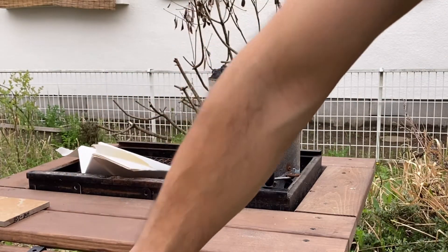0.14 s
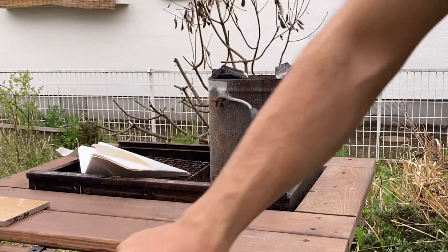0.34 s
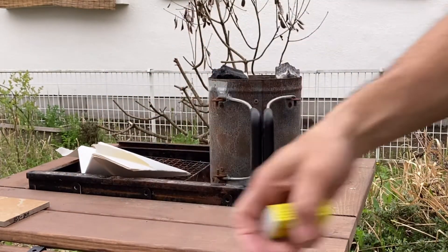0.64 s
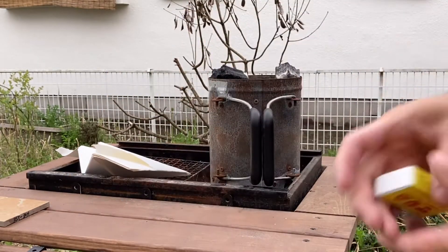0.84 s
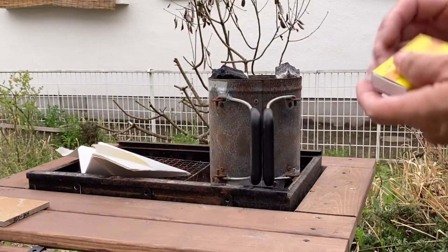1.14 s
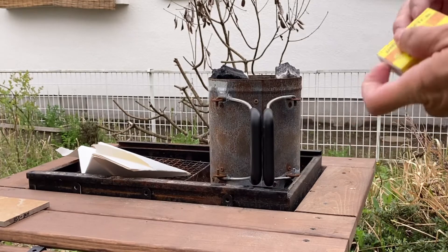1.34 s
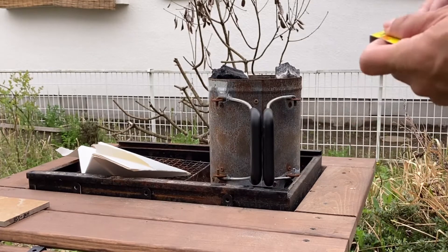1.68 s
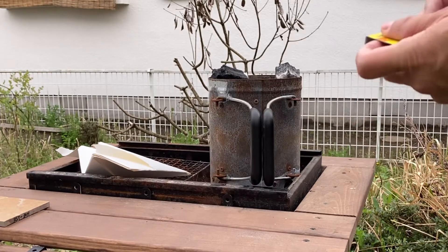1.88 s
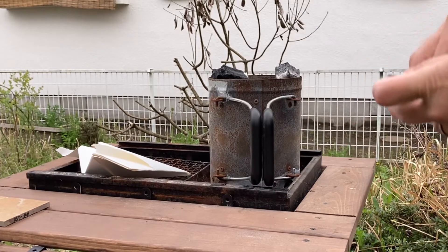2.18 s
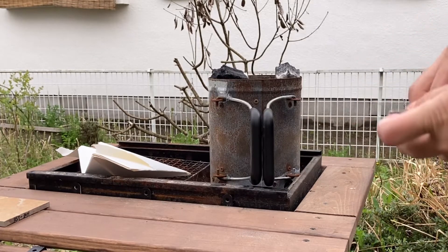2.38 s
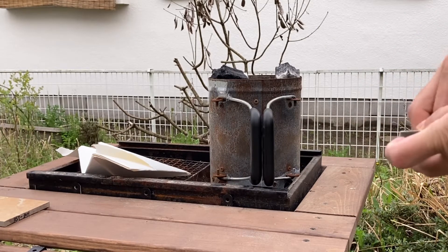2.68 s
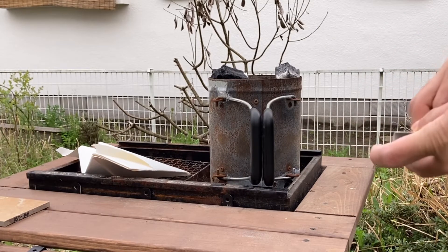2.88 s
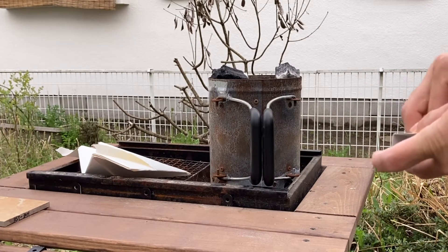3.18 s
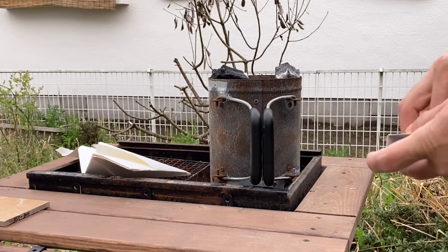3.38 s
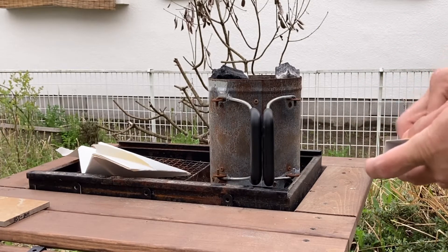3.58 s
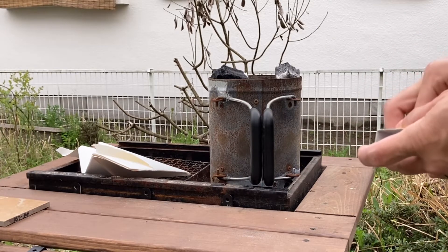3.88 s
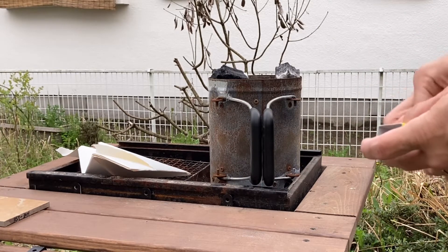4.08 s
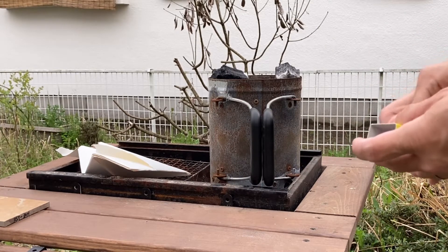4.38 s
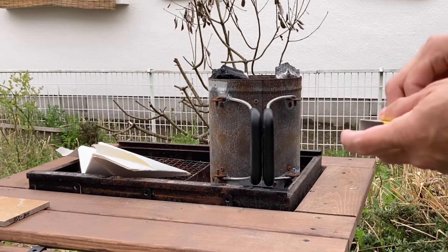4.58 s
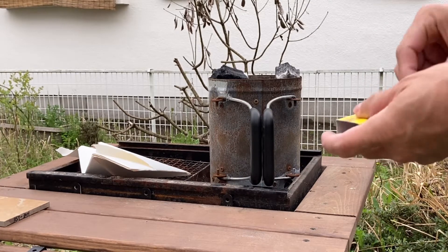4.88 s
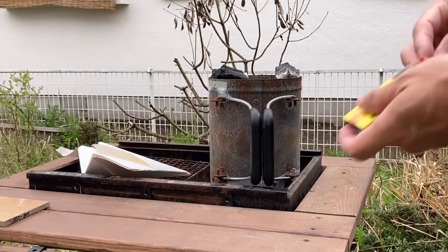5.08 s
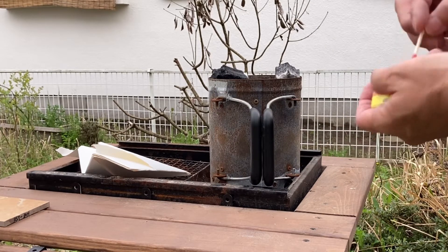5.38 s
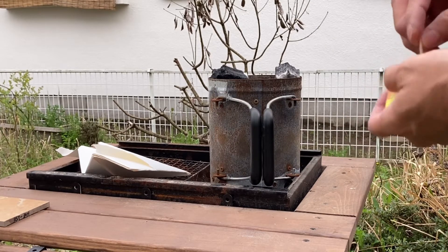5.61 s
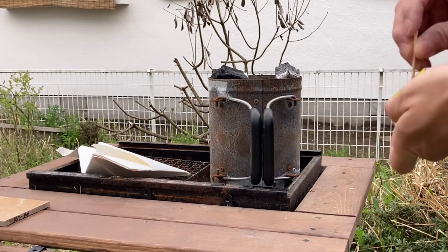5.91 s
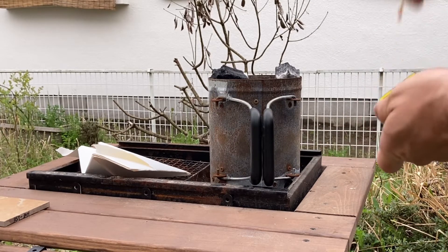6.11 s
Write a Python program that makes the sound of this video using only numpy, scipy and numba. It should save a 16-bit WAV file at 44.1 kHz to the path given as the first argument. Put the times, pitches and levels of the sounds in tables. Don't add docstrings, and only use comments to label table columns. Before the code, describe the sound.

A close stereo pickup catches a bright, irregular flurry of metal clinks on a garden table during the first three quarters of a second. Cardboard clicks and soft finger rustling follow, with scattered faint ticks of loose matches. The rummaging then grows denser, dry and woody, before a couple of sharper box knocks and quiet final ticks. Low distant traffic, slight wind and a very faint machine tone lie behind.

```python
import sys
import numpy as np
from scipy import signal
from scipy.fft import rfft, irfft, next_fast_len
from scipy.io import wavfile
from scipy.ndimage import uniform_filter1d
from numba import njit

SR = 44100
rng = np.random.default_rng(int(sys.argv[2]) if len(sys.argv) > 2 else 0)


def boost(x):
    u = np.asarray(x, float) / 20
    return 10 ** u


def output_pcm(signal):
    pcm = np.clip(np.atleast_2d(signal).T, -1, 1) * 32767
    wavfile.write(sys.argv[1], SR, np.round(pcm).astype(np.int16))


N = 275620


def columns(table, count=N):
    s, *values = np.transpose(table)
    return [np.interp(np.arange(count) / SR, s, v) for v in values]


def unit(x):
    return x / np.sqrt(np.mean(x ** 2))


def colour(x, table):
    hz, db = np.transpose(table)
    size = next_fast_len(N, True)
    f = np.arange(1, size // 2 + 2) * SR / size
    gain = boost(np.interp(np.log(f), np.log(hz), db))
    return irfft(rfft(x, size) * gain, size)[..., :N]


@njit
def ring(x, hz, t60, keep):
    pole = np.exp((2j * np.pi * hz - np.log(1000) / t60) / SR)
    out, z = np.empty(len(x)), 0j
    for i in range(len(x)):
        z = z * pole * keep[i] + x[i]
        out[i] = z.imag
    return out


def grit(count, spread_db):
    return unit(rng.standard_normal(count) * boost(spread_db * rng.exponential(size=count)))


def walk(rate, count=N):
    k = int(SR / rate)
    steps = np.repeat(rng.standard_normal(count // k + 1), k)
    return 2.14 * uniform_filter1d(uniform_filter1d(steps, k), k)[:count]


# pitch_hz, level_db (per Hz)
YARD_TONE = [(20, -36), (40, -8), (100, -8.5), (230, -10), (400, -9.5), (735, -17.5), (1260, -17.5),
             (2500, -28), (4000, -32.5)]
# start_s, end_s, level_db
MACHINE_RUNS = [
    (2.737, 3.3, -76),
    (3.543, 4.892, -71.5),
    (6.001, 6.5, -76),
]
# centre_s, level_db, half_length_s
PUFFS = [(0.378, -64, 0.29), (.95, -65, 0.032), (1.303, -69.5, 0.22), (2.42, -66.5, 0.051),
         (3.846, -65, 0.071), (4.505, -58, 0.03), (4.963, -59, 0.025), (5.6, -69, .05)]


def yard():
    t = np.arange(N) / SR
    far = YARD_TONE + [(6500, -57.5), (16000, -66)]
    mid, side = (colour(rng.standard_normal(N), far) for _ in range(2))
    side = colour(side, [(20, -7), (300, -8), (1000, 0), (5000, 4)])
    gust = boost(-65.5 + walk(3.204)) / np.std(mid)

    wind = unit(colour(rng.standard_normal(N), [(20, -30), (42, -2), (62, 0), (110, -10), (600, -90)]))
    wind_level = boost(-69 + 1.6 * walk(9.5))
    wind_level += sum(boost(db) * np.exp(-((t - s) / half) ** 2) for s, db, half in PUFFS)

    machine_hz, edge_s, waver_db = 402, 0.019, 1.7
    runs = sum(boost(db) * np.clip(np.minimum(t - on, off - t) / edge_s, 0, 1) for on, off, db in MACHINE_RUNS)
    tone = np.sqrt(2) * np.sin(2 * np.pi * np.cumsum(machine_hz + 1.62 * walk(6)) / SR)
    hum = runs * boost(waver_db * walk(21.03)) * tone
    return gust * (mid + side * np.array([[1], [-1]])) + hum + wind_level * wind * boost(np.array([[-1.2], [1.2]]))


# start_s, peak_db, top_modes_db, table_thud_db, chatter_length_s
CLINKS = [(0.063, -38.5, -5, -55.5, 0.019), (0.1085, -20.5, -3, -41.5, 0.00041),
          (0.138, -29.5, -3.5, -47.5, 0.017), (0.175, -36, -6, -59, 0.0067),
          (0.184, -29.5, -11, -46.5, 0.022), (0.193, -30, -5.5, -60.5, 0.06),
          (0.272, -27, -15, -49.5, 0.0055), (0.288, -19.5, -4.5, -41, 0.00076),
          (0.3, -19, -10.5, -37.5, 0.02), (0.352, -23.5, -0.5, -26.5, 0.0011),
          (0.362, -19.5, -0.5, -29.5, 0.0029), (0.373, -23.5, 0, -27.5, 0.025),
          (0.4245, -16, -9, -40.5, 0.0012), (0.429, -22.5, 1, -37.5, 0.024),
          (0.462, -23.5, -11, -38, 0.0056), (0.484, -31.5, -3.5, -40.5, 0.0078),
          (0.523, -22, -8.5, -41, 0.032), (0.643, -46.5, -4, -50, 0.021),
          (0.697, -42.5, -14.5, -54, 0.0021), (0.706, -29.5, -2.5, -37.5, 0.0076),
          (0.7375, -28, 0, -52, 0.00061), (0.745, -29.5, -2, -44.5, 0.0079),
          (1.1082, -39.5, -10, -51, 0.00066), (1.122, -37, -1, -45.5, 0.0068)]
# pitch_hz, extra_db of the modes near it
STRUCK = [(6360, 2), (11700, 4), (6380, 7.5), (6410, 10), (6410, 6.5), (7750, -2), (6400, 4), (7750, 0.5),
          (7800, 1), (11500, 0), (11500, 7), (11500, 5.5), (15200, 6.5), (7770, 5), (7750, 2.5),
          (15300, 9.5), (7750, 0), (12160, 4), (7750, -5), (11600, -1), (11000, 6), (10540, 1.5), (9000, 3),
          (11700, 3.5)]
STEEL_HZ = [2708, 3730, 3801, 4242, 4791, 5103, 5873, 6357, 6900, 7543, 7752, 8030, 8805, 9690, 9992, 10540,
            10628, 10683, 11299, 11707, 11787, 12200, 12620, 13050, 14325, 15080, 15300, 15740]
# level_db, ring_s (time to fall 60 dB)
STEEL = [(-16.5, 0.1), (-15.5, 0.22), (-10.5, 0.16), (-10, 0.0796), (-15, .08), (-5.5, 0.17), (-19, 0.15),
         (-3.5, 0.14), (-13.5, 0.12), (-9.5, 0.17), (0.5, 0.068), (-8.5, 0.15), (8, 0.027), (-5, 0.096),
         (-8, .09), (-7.5, 0.13), (-8.5, 0.2), (-15, 0.033), (-8, 0.086), (0, 0.012), (-6, 0.096),
         (-19.5, 0.054), (-14.5, 0.17), (3, 0.029), (-3.5, 0.17), (-13, 0.047), (-10.5, 0.15), (-14, .09)]
# pitch_hz, level_db, ring_s (time to fall 60 dB)
TABLE = [(171, -17.5, 0.07), (317, -7, 0.026), (430, -6, 0.09), (584, -5, 0.028), (830, -7, 0.04),
         (1005, -3.5, 0.017), (1200, 3, 0.011), (1642, -0.5, 0.017), (2050, -0.5, 0.01),
         (2380, -11.5, 0.018), (3080, -6, 0.011)]
# centre_s, half_length_s, loss_db
GRIPS = [(0.11, 0.0089, 19.5), (0.326, 0.01, 18.5), (0.384, 0.0036, 5), (0.431, .006, 11), (0.5, 0.023, 0),
         (0.715, 0.0047, 6.5), (0.743, 0.015, 5), (1.127, 0.01, 11.5)]


def steel():
    count = int(1.6 * SR)
    t = np.arange(count) / SR
    s, peak_db, top_db, thud_db, length = np.transpose(CLINKS)
    low_db = -1 - 0.24 * (peak_db - np.mean(peak_db))
    length = np.maximum(length, 0.0003)[:, None]
    chatter = np.exp(-((t - s[:, None] - length / 2) / length) ** 2) / np.sqrt(length * SR)
    loss_db = sum(abs(db) * np.exp(-((t - at) / half) ** 2) / (half * SR * np.sqrt(np.pi))
                  for at, half, db in GRIPS)
    keep = boost(-loss_db)
    struck_hz, struck_db = np.transpose(STRUCK)
    struck_octaves = 0.08
    chance = rng.standard_normal((len(s), len(STEEL) + len(TABLE)))
    touch = boost(2.2 * rng.exponential(size=count))
    out, thud = np.zeros(N), np.zeros(N)

    for k, (hz, db, t60) in enumerate(np.column_stack([STEEL_HZ, STEEL])):
        top, low = hz > 9200, hz < 5600
        near_db = struck_db * np.exp(-(np.log2(hz / struck_hz) / struck_octaves) ** 2)
        wobble = keep * np.exp(2j * np.pi * 4 * walk(30, count=count) / SR)
        blow_db = peak_db + top * (top_db + 5) + low * low_db + 4.5 * chance[:, k] - 6.5 + near_db
        contacts = unit(touch * rng.standard_normal(count))
        out[:count] += boost(db) * ring(boost(blow_db) @ chatter * contacts, hz, t60, wobble)
    out[:count] += boost(-52.5) * np.sin(2 * np.pi * STEEL_HZ[0] * t) * np.exp(-t / 0.045)

    for k, (hz, db, t60) in enumerate(TABLE):
        blows = boost(thud_db + 0.6 * chance[:, -k - 1]) @ chatter
        thud[:count] += boost(db) * ring(blows * rng.standard_normal(count), 1.0 * hz, t60, np.ones(count, complex))

    crack = boost(peak_db + top_db + 8 - 1200 * length[:, 0]) @ chatter
    out[:count] += crack * unit(touch * np.gradient(rng.standard_normal(count)))
    return colour(out, [(1500, -35), (2600, 1)]) + colour(thud, [(60, -40.5), (130, 2)])


# time_s, level_db
EFFORT = [(.9, -58.5), (1.2, -68.5), (1.29, -60.5), (1.5, -59.5), (1.62, -72.5), (1.96, -60), (2.5, -68),
          (3.03, -58.5), (3.28, -66.5), (3.4, -63), (4.0, -62.5), (4.47, -64), (4.75, -78.5), (5.12, -57.5),
          (5.3, -77), (5.47, -62.5), (5.62, -66), (6.05, -76.5)]
# centre_s, level_db, half_length_s, centre_hz, treble_db
SLIDES = [(0.839, -43, 0.02, 1570, -18.5), (0.843, -48, 0.0096, 3892, 11.5), (1.707, -44, 0.022, 2966, 3.5),
          (1.814, -52, 0.019, 2520, -28), (1.928, -56.5, 0.016, 2350, -5), (2.104, -57, 0.046, 2450, -1),
          (2.666, -59, 0.013, 3170, -6), (2.944, -42.5, 0.012, 2470, 2), (3.082, -33, 0.0033, 2830, -27),
          (3.223, -45, 0.013, 2160, -3.5), (3.367, -55.5, 0.05, 2320, -8), (3.62, -45.5, 0.0049, 2520, 1.5),
          (3.834, -43, 0.012, 2050, -3), (4.091, -53, 0.0086, 2200, 4.5), (4.094, -64, 0.0055, 2500, 0),
          (4.49, -63, 0.044, 2240, -7), (4.624, -56.5, 0.018, 2780, -5.5), (4.897, -61, 0.029, 2195, -6),
          (4.937, -54, 0.0082, 2015, -2), (5.031, -56, 0.009, 2050, 12.5), (5.052, -51, 0.029, 1480, -5.5),
          (5.199, -61.5, 0.027, 2040, -1.5), (5.378, -54.5, 0.023, 1610, -3.5),
          (5.803, -56.5, 0.021, 1310, -20), (5.836, -63, 0.028, 1500, -9)]
# pitch_hz, level_db (per Hz)
CARD = [(290, -49), (500, -6.5), (850, -4), (1540, -4.5), (2720, -3.5), (5500, -16.5), (7150, -42),
        (12100, -120)]
# pitch_hz, level_db (per Hz)
CRACK = [(2500, -34), (4000, 1), (5800, -5), (8000, 0), (11000, -1), (13500, -9), (15500, -4.5),
         (16600, -38)]


def handling():
    effort_db = columns(EFFORT)[0]
    treble_db = -7 + np.mean(effort_db) + 1.48 * (effort_db - np.mean(effort_db))
    patch = boost(1.7 * walk(30))
    grains = grit(N, 2.6)
    fine = unit(colour(grains, CRACK))
    skin = boost(effort_db - 3) * unit(colour(grit(N, 1.7), CARD))
    out = patch * (skin + boost(treble_db) * unit(colour(grit(N, 1.4), CRACK)))

    boards_s, boards_db, rise_db_s, fall_db_s = 0.56, -61, 34, 16.5
    boards = colour(rng.standard_normal(N), [(90, -30), (170, -3), (320, 0), (600, -3), (2000, -70)])
    since = np.arange(N) / SR - boards_s
    fade_db = np.maximum(-rise_db_s * since, fall_db_s * since)
    out += boost(boards_db - fade_db + 2 * walk(28)) * unit(boards)

    for s, db, half, hz, top_db in SLIDES:
        i = slice(int((s - 0.1) * SR), int((s + 0.1) * SR))
        swell = np.exp(-((np.arange(i.start, i.stop) / SR - s) / half) ** 2)
        band = signal.lfilter(*signal.butter(2, [hz / 1.42, hz * 1.35], "band", fs=SR), grains[i])
        out[i] += boost(db) * swell * patch[i] * (unit(band) + boost(top_db) * fine[i])
    return out


# start_s, peak_db, box_pitch_hz, crack_db
TURN_TICKS = [(0.793, -23, 1450, -28), (0.802, -23, 1570, -17), (0.819, -34, 1610, -26),
              (0.829, -27, 1530, -35), (0.836, -22, 1536, -11), (0.844, -17.5, 3600, -9),
              (0.874, -30.5, 1530, -11), (0.895, -33.5, 1500, -7), (0.984, -44.5, 1470, -15),
              (1.184, -43, 1430, -8), (1.677, -41, 4240, -17), (1.704, -43, 3000, -20),
              (1.812, -28.5, 2280, -10), (1.9, -30.5, 2800, -24), (2.021, -37, 2450, -17),
              (2.056, -34.5, 2440, -11.5), (2.088, -33, 2390, -3), (2.162, -39, 2620, -10.5),
              (2.364, -35.5, 2750, -7.5), (2.586, -41, 2300, -19.5), (2.664, -41, 2940, -12),
              (2.718, -38, 2280, -7), (4.938, -30.5, 3370, -15.5), (5.015, -16, 2170, -17),
              (5.171, -31.5, 2300, -11), (5.348, -18.5, 2080, -45), (5.797, -43.5, 1300, -20),
              (5.818, -32.5, 1350, -16), (5.848, -39, 1790, -26)]
# start_s, peak_db, box_pitch_hz, crack_db
RUMMAGE_TICKS = [(2.79, -26, 1010, 0.5), (2.818, -34, 2200, -27), (2.94, -23.5, 1480, -16),
                 (3.083, -21, 2910, -5.5), (3.131, -32, 2490, -6.5), (3.153, -29.5, 2580, -7),
                 (3.216, -29.5, 2280, -14.5), (3.324, -34, 2960, -3), (3.35, -37.5, 2240, -5),
                 (3.445, -34, 2200, -24.5), (3.537, -30.5, 1620, -13.5), (3.572, -31.5, 1480, -2.5),
                 (3.622, -28, 4370, -10.5), (3.682, -37.5, 2500, -21), (3.726, -30, 2290, -17),
                 (3.812, -32.5, 2700, -9.5), (3.833, -26, 2600, -5), (3.884, -37, 2580, -4),
                 (3.898, -39, 3330, -3.5), (3.915, -20.5, 2160, -11.5), (3.979, -33.5, 2480, -10),
                 (4.062, -29.5, 2800, -13), (4.079, -28.5, 3220, -11.5), (4.142, -36.5, 2220, -5.5),
                 (4.172, -31.5, 3680, -10.5), (4.215, -27.5, 2420, -9), (4.378, -30, 2510, -20),
                 (4.439, -34, 1860, -18), (4.478, -31.5, 2190, -17.5), (4.487, -28, 2460, -22)]
# start_s, peak_db, box_pitch_hz
NUDGES = [(1.525, -46.5, 2100), (1.794, -40, 2140), (1.915, -32.5, 2180), (2.009, -47, 2220),
          (2.097, -32, 2370), (2.183, -39, 2660), (2.398, -47, 1310), (2.809, -34, 2190),
          (2.852, -43, 1980), (2.883, -39, 2060), (2.951, -23, 2620), (3.019, -45, 1160),
          (3.092, -50, 3590), (3.201, -36, 2340), (3.244, -32.5, 2560), (3.282, -43.5, 2050),
          (3.405, -38, 1750), (3.463, -41, 2250), (3.655, -37, 2350), (3.746, -39, 2620),
          (3.761, -56, 2200), (3.782, -40, 2500), (3.954, -41, 2520), (4.098, -30.5, 1770),
          (4.301, -41, 2400), (4.327, -40.5, 2540), (4.518, -38.5, 2520), (4.539, -40.5, 2190),
          (4.611, -49.5, 2640), (5.114, -39.5, 1380)]
# start_s, peak_db, box_pitch_hz
MORE_NUDGES = [(1.29, -48.5, 1640), (1.459, -42, 4100), (1.561, -50, 2010), (1.686, -42, 2780),
               (1.714, -32.5, 2870), (1.969, -52, 2480), (2.079, -40.5, 2230), (2.225, -47.5, 2670),
               (2.268, -44, 3210), (2.49, -56, 1090), (2.712, -50, 1790), (2.986, -42, 2120), (3.035, -39, 2730),
               (3.118, -37, 2310), (3.166, -34, 2570), (3.356, -37, 2240), (3.532, -34, 2260), (3.565, -34, 2270),
               (3.584, -36.5, 2560), (3.674, -39.5, 2500), (3.801, -37, 2480), (3.825, -28, 2610),
               (4.049, -45, 2820), (4.202, -41.5, 3460), (4.411, -51, 2060), (4.916, -42, 1770),
               (5.026, -33, 3200), (5.042, -32.5, 2000), (5.063, -38, 1460), (5.074, -45, 1350),
               (5.178, -39, 2340), (5.184, -45, 1760), (5.511, -54.5, 1260), (5.786, -53, 1320),
               (5.832, -37.5, 1535), (5.877, -52, 1360), (3.13, -37.5, 880), (2.72, -42, 850)]


def matchbox():
    body, crack, tail = np.zeros((3, N + SR))
    t = np.arange(4000) / SR
    lead = 300
    nudges = [(s, db, hz, -13.5) for s, db, hz in NUDGES]
    loose = [(s, db + 1.5, hz, -14) for s, db, hz in MORE_NUDGES]
    ticks = np.vstack([TURN_TICKS, RUMMAGE_TICKS, nudges, loose])
    jostle = grit(len(body), 3.5)
    chance = rng.standard_normal((len(ticks), 2))

    for (s, db, hz, crack_db), c in zip(ticks, chance):
        start = int(s * SR) - lead
        i = slice(start, start + len(t))
        turn = np.maximum(t - lead / SR, 0) * hz
        walls = np.sin(2 * np.pi * turn) * np.exp(-turn / 1.78)
        walls += 0.12 * np.sin(2 * np.pi * turn * 1.517 * boost(c[0] / 2)) * np.exp(-turn / 4.5)
        walls *= np.minimum(turn / 1.53, 1)
        body[i] += boost(db - 6 - 0.4 * max(crack_db + 8, 0)) * walls / np.max(np.abs(walls))
        rattle = np.minimum(t * SR / lead, 1) ** 3.2 * np.exp(-turn / hz / (0.0084 * boost(c[1])))
        snap = (turn > 0) * np.exp(-(t - lead / SR) / 0.0011)
        crack[i] += boost(db + crack_db - 1.5) * (snap + 0.23 * rattle)
        tail[i] += boost(db - 13 + 0.5 * crack_db) * rattle
        pitched = signal.fftconvolve(rattle * jostle[i], walls[lead:])[:len(t)]
        body[i] += boost(db - 21.5) * pitched / np.sqrt(np.sum(walls ** 2))

    settling = tail[:N] * unit(colour(grit(N, 3.4), CARD))
    cracking = crack[:N] * unit(colour(grit(N, 1.8), CRACK))
    return colour(body[:N] + settling + cracking, [(300, -40), (750, 0)])


# pitch_hz, level_db
WALL = [(250, -28), (700, -9), (2500, -10), (4300, -9), (5600, -4), (7000, -13), (9000, -20), (16000, -15)]


def ports(near, phase, pan):
    table_t60_s, wall_t60_s, wall_delay_s, table_db = 0.026, 0.07, 0.004, -14
    t = np.arange(SR // 4) / SR
    scatter = []
    for t60 in (table_t60_s, wall_t60_s, wall_t60_s):
        fading = rng.standard_normal(len(t)) * np.exp(-np.log(1000) * t / t60)
        scatter.append(unit(fading) / np.sqrt(len(t)))
    scatter[1:] = [np.roll(h, int(wall_delay_s * SR)) for h in scatter[1:]]
    table, *wall = (signal.fftconvolve(near, h)[:N] for h in scatter)

    size = next_fast_len(N, True)
    f = np.arange(size // 2 + 1) * SR / size
    turn = boost(np.interp(f, *np.transpose(pan)) / 2) * np.exp(0.5j * np.interp(f, *np.transpose(phase)))
    heard = rfft(near + boost(table_db) * table, size)
    direct = np.array([irfft(heard * turn ** side, size)[:N] for side in (1, -1)])
    return direct + colour(np.array(wall), WALL)


# pitch_hz, lead_radians
STEEL_PHASE = [(0, 0), (2070, .6), (3000, 1.9), (5500, 3.1), (6900, 0), (8950, -3.1), (11500, -6.4),
               (13800, -9.4), (16500, -13)]
BOX_PHASE = [(0, 0), (1400, -.5), (3500, -.6), (4800, -1.7), (5900, -2), (6900, -.2), (8950, -3.1),
             (11500, -6.4), (13800, -9.4), (16500, -13)]
# pitch_hz, level_db
STEEL_PAN = [(60, -1.5), (300, .5), (700, 3), (2400, 1.5), (6000, 2), (7000, .5), (15000, 0)]
BOX_PAN = [(60, -1.5), (250, 0), (700, -1), (2400, 1), (4100, .5), (5500, -1.5), (7000, 0), (15000, 0)]


def scene():
    parts = ports(steel(), STEEL_PHASE, STEEL_PAN)
    box = ports(handling() + matchbox(), BOX_PHASE, BOX_PAN)
    return yard() + parts + box


def roll_off(x):
    return signal.sosfilt(signal.butter(12, 16870, fs=SR, output="sos"), x)


def record(dry):
    return roll_off(dry)


dry = scene()
out = record(dry)
output_pcm(out)
```